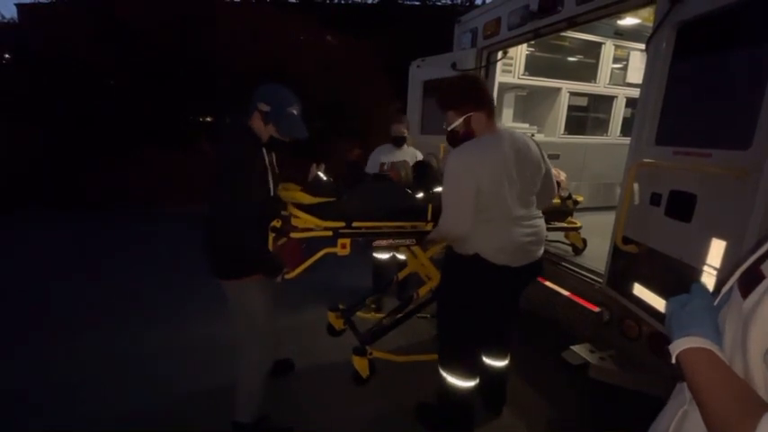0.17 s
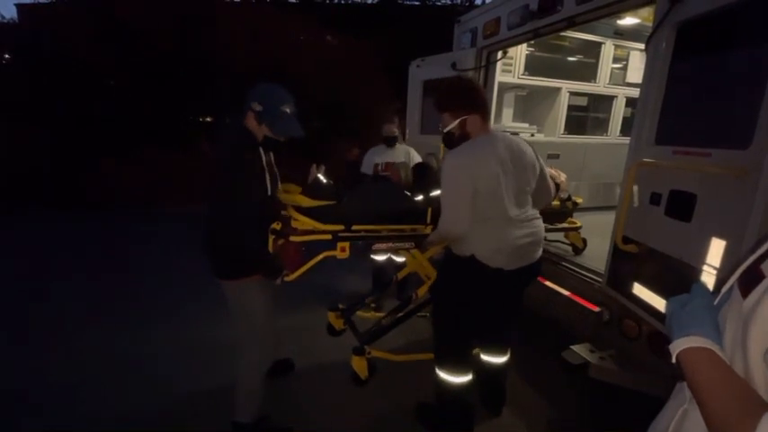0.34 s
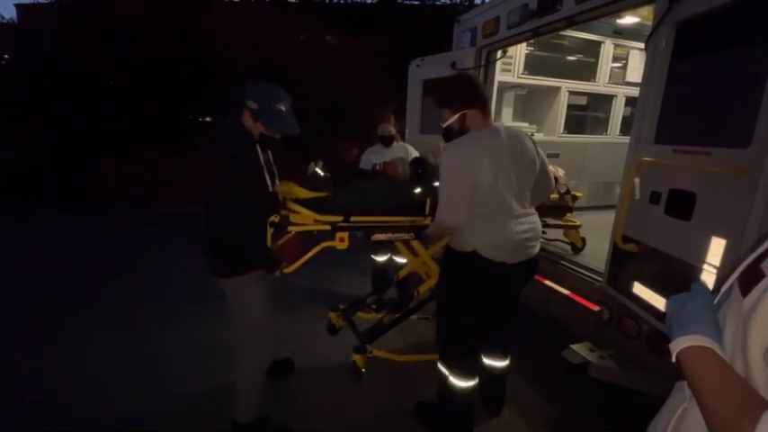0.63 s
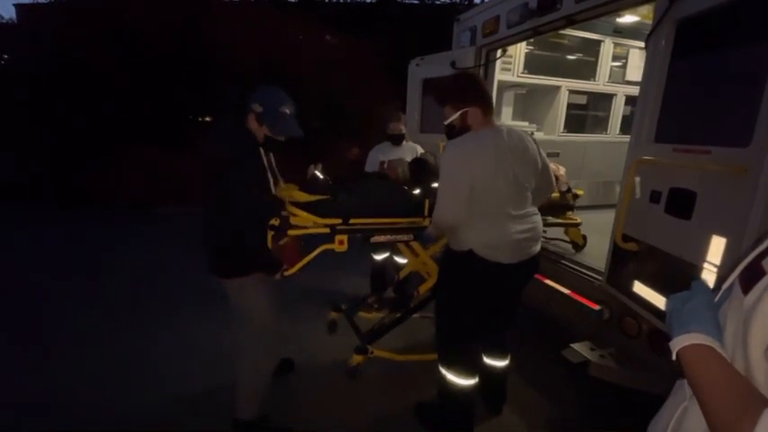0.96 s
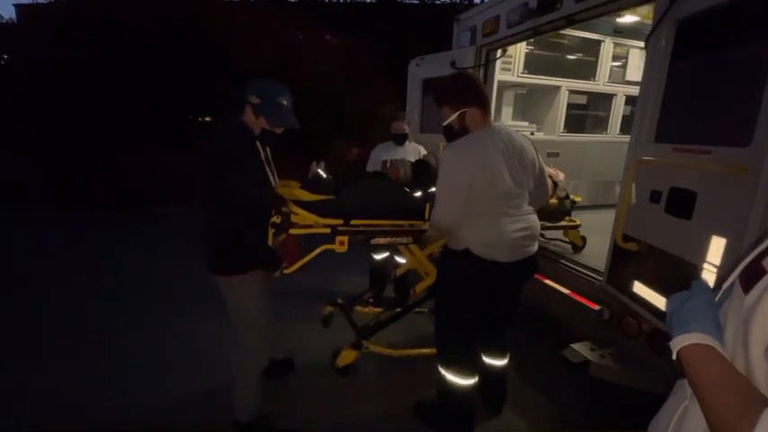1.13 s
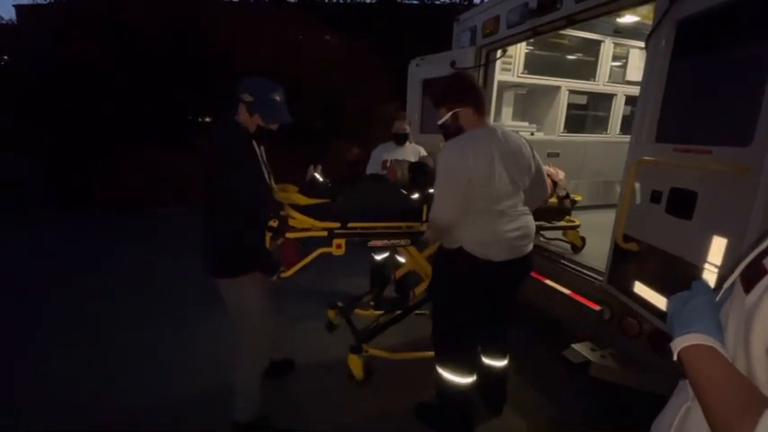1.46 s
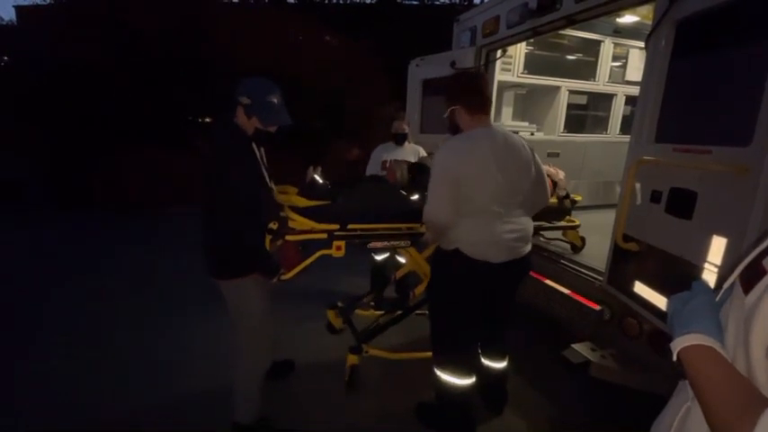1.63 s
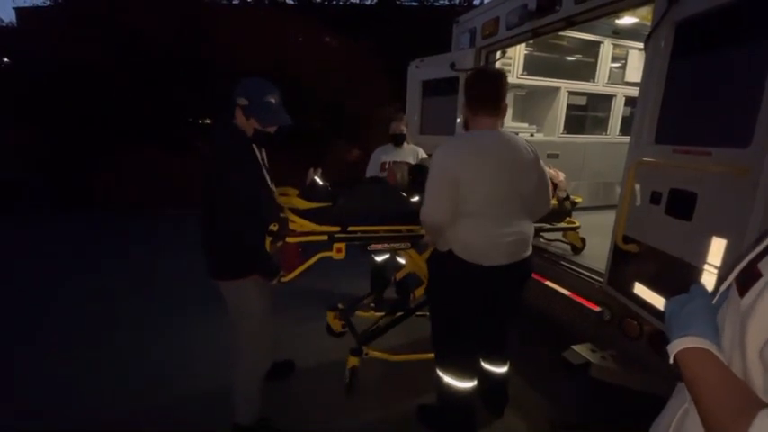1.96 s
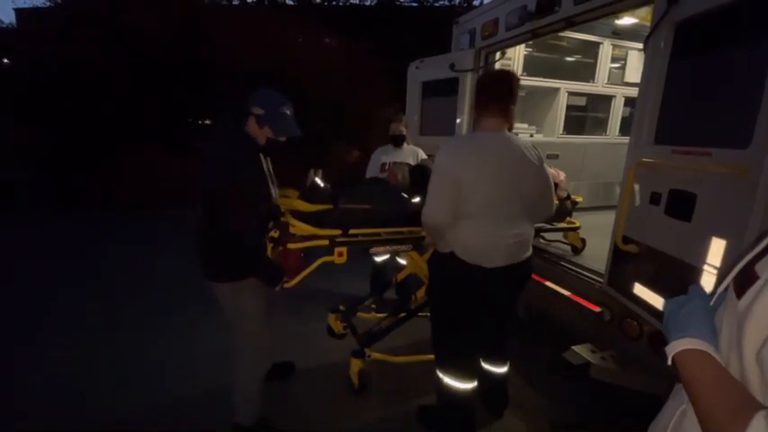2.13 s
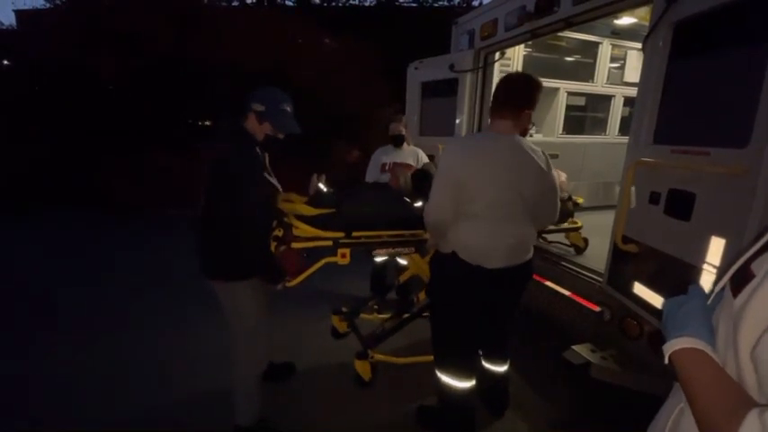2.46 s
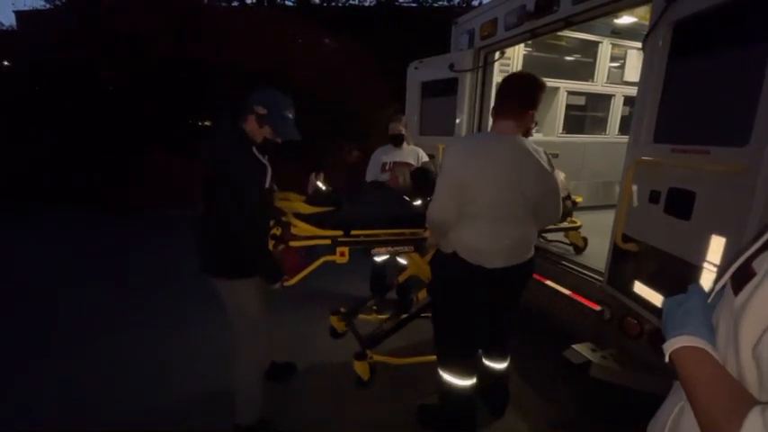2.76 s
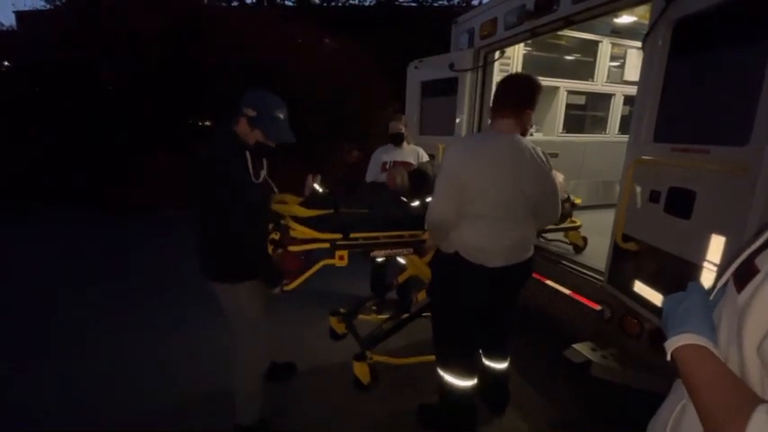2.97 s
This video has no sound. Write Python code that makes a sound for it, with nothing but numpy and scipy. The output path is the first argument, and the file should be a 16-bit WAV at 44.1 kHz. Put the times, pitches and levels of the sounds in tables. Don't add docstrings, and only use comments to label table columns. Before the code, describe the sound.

A wheeled metal stretcher clatters as it is lifted, quiets for a moment, then knocks and rattles densely as its legs fold; outdoors at night, close stereo pickup over a faint engine drone.

```python
import sys
import numpy as np
from scipy import signal
from scipy.fft import rfft, irfft
from scipy.io import wavfile
from scipy.ndimage import uniform_filter1d

SR = 44100
rng = np.random.default_rng(int(sys.argv[2]) if len(sys.argv) > 2 else 0)


def invert_db(level):
    return 10 ** (np.asarray(level, dtype=float) / 20)


def wav_out(sig):
    wavfile.write(sys.argv[1], SR, np.round(np.clip(np.atleast_2d(sig).T, -1, 1) * 32767).astype(np.int16))


N = 136710
HZ = np.maximum(np.fft.rfftfreq(N, 1 / SR), 1)

# frequency in Hz, level in dB per Hz.
NIGHT_SPECTRUM = [(15, -60), (25, -31), (86, -12.5), (271, -27), (2400, -54), (3400, -74), (5000, -56),
                  (8780, -56.5), (10600, -69)]
# frequency in Hz, correlation from -1 to 1.
NIGHT_CORRELATION = [(25, .6), (80, .8), (380, .5), (2400, .05)]
# start in seconds, level in dB, latch over tube in dB, pitch of the struck piece in Hz.
LIFT_KNOCKS = [(0.002, -29, -6.5, 2630), (0.068, -34.5, -1, 2100), (0.206, -34.5, -40, 1140),
               (0.266, -37.5, -14, 1170), (0.328, -32, -30, 1070), (0.35, -31.5, -10.5, 9300),
               (0.445, -39, -15, 1350), (0.466, -27.5, -7, 5230), (0.491, -34, -12, 2920),
               (0.51, -24.5, -35, 3000), (0.537, -22, -40, 1190), (0.577, -32, -2.5, 1150),
               (0.661, -21.5, -20, 4300), (0.675, -12, -25, 3300), (0.695, -13.5, -14.5, 840),
               (0.784, -23.5, -7.5, 1300), (0.815, -21, -10, 4380), (0.843, -15.5, -12, 1210),
               (0.919, -4.5, -13, 1050), (0.923, -8, -31, 1810), (0.961, -19.5, -9.5, 1650),
               (1.01, -15.5, -40, 3050), (1.052, -12.5, -43, 3150), (1.079, -17.5, -4, 4694),
               (1.096, -13, -6.5, 4740), (1.142, -21, -17, 9900), (1.253, -10.5, -29, 1360),
               (1.274, -24.5, -3.5, 1310), (1.313, -29.5, -9, 865), (1.438, -49, 9, 8800),
               (1.527, -57, 7, 6840), (1.606, -48, 0.5, 6240)]
# start in seconds, level in dB, latch over tube in dB, pitch of the struck piece in Hz.
FOLD_KNOCKS = [(1.952, -39, -5, 2800), (1.98, -51, 6, 3630), (2.046, -26, -7, 8860),
               (2.084, -20, -28, 1300), (2.098, -14.5, -9, 2620), (2.125, -10.5, -13, 1170),
               (2.138, -16.5, -5, 1090), (2.222, -16.5, -13.5, 1110), (2.25, -17.5, -30, 1100),
               (2.289, -19, -7.5, 1270), (2.324, -19, -4.5, 824), (2.347, -16.5, -13, 1320),
               (2.365, -11, -14, 880), (2.379, -7, -4, 950), (2.392, -14.5, -7.5, 940),
               (2.434, -24.5, -4.5, 1200), (2.497, -13.5, -12.5, 5300), (2.559, -18, -6, 1090),
               (2.583, -10.5, -9.5, 2340), (2.62, -3, -9.5, 5036), (2.642, -17, 4.5, 7400),
               (2.706, -16, -6, 4070), (2.731, -10.5, -24, 1150), (2.744, -25.5, -0.5, 1720),
               (2.794, -29, 0, 895), (2.808, -8, -14, 1300), (2.838, -6, -10, 1080),
               (2.85, -13, -0.5, 7850), (2.944, -21, -9.5, 2370), (3.002, -15, -16.7, 1270)]
KNOCKS = LIFT_KNOCKS + FOLD_KNOCKS
# time in seconds, rattle level in dB.
SHAKING = [(0, -44), (.33, -61.5), (.41, -67), (0.521, -40.5), (.63, -48), (1.0, -38.5), (1.22, -47),
           (1.45, -56.5), (1.7, -63.5), (1.92, -62), (2.12, -45.5), (2.6, -36.5), (3.003, -38),
           (3.092, -49.5)]
# frequency in Hz, width in Hz, level in dB.
TUBE_MODES = [(640, 49, -4), (820, 115, -1), (1116, 270, -0.5), (1270, 120, -2), (1733, 200, 4),
              (2230, 80, -6.5), (2460, 43, -4), (3150, 1100, -9.5)]
# frequency in Hz, width in Hz, level in dB.
LATCH_MODES = [(4680, 73, -12.5), (5850, 230, 3), (6270, 260, 4), (6840, 45, -4), (8750, 270, -28),
               (8700, 85, -11), (9220, 89, -11), (10840, 53, -7)]
# frequency in Hz, level in dB per Hz.
CONTACT_SPECTRUM = [(180, -21), (300, 2.5), (532, -12), (943, -5.5), (1540, -9.5), (2400, -19), (2970, -14),
                    (11000, -21.5), (15000, -28.5)]
# start in seconds, level in dB, pitch in Hz.
SHARP_TICKS = [(0.07, -38, 5230), (0.071, -37, 10980), (0.353, -41, 11400), (0.353, -44, 8700),
               (0.469, -35, 10940), (0.923, -23, 10160), (0.925, -31, 7850), (0.926, -18, 5500),
               (0.925, -13, 1810), (0.925, -19, 6760), (0.992, -29, 10850), (1.056, -21.5, 3180),
               (1.081, -36, 10900), (1.084, -28, 4700), (1.096, -45, 12400), (1.101, -34, 4530),
               (1.101, -41, 11110), (1.255, -19, 1930), (1.256, -29, 5600), (1.313, -35, 7200),
               (1.439, -49, 10100), (2.054, -40, 9000), (2.097, -23, 1210), (2.1, -23, 5860),
               (2.101, -40, 12300), (2.099, -44, 2600), (2.102, -31, 7940), (2.103, -26, 7300),
               (2.102, -30, 9150), (2.142, -23, 7130), (2.145, -23, 11000), (2.144, -20.5, 8780),
               (2.145, -18.5, 4780), (2.254, -22.5, 930), (2.349, -12, 1280), (2.382, -26, 1090),
               (2.386, -24, 9700), (2.387, -18, 4850), (2.387, -9, 6330), (2.395, -19, 9700),
               (2.398, -17, 8700), (2.398, -32, 12000), (2.398, -24, 11110), (2.398, -27, 5040),
               (2.506, -34, 5230), (2.565, -15.5, 1530), (2.629, -18, 11000), (2.64, -8, 6160),
               (2.64, -18, 9600), (2.644, -24, 10800), (2.71, -18, 4000), (2.732, -17, 1080),
               (2.746, -20.5, 5100), (2.797, -32, 10850), (2.813, -14.5, 900), (2.818, -16, 6070),
               (2.847, -20, 10800), (2.852, -24, 10800), (2.856, -27, 8530), (2.857, -26, 7700),
               (.205, -34, 1070), (.268, -35, 860), (.33, -31.5, 880), (.51, -25, 3160),
                 (.789, -23, 1190), (1.008, -24.5, 3160), (2.001, -36, 1070), (2.046, -29, 1050),
                 (2.221, -26, 1170), (2.33, -32, 4750), (2.582, -31, 4440), (2.793, -27, 1030)]
# start in seconds, level in dB, pitch in Hz.
DECK_THUMPS = [(.205, -36, 349), (0.543, -30, 285), (0.679, -15.5, 211.6), (0.7, -20.5, 297),
               (0.711, -21, 151), (0.726, -28, 76), (0.752, -27, 196.5), (0.839, -37.5, 380.5),
               (0.914, -37, 322), (0.917, -30, 102), (1.059, -21, 205), (1.071, -22, 119.4),
               (1.097, -30.5, 79), (1.116, -28.5, 185.5), (1.256, -37, 285), (2.102, -27, 300),
               (2.132, -26, 241.3), (2.228, -31.5, 324), (2.378, -20, 253), (2.388, -25.5, 106),
               (2.419, -30, 62.3), (2.618, -17, 323), (2.632, -27, 60.4), (2.669, -26.5, 144),
               (2.692, -30, 62), (2.81, -34, 66), (2.842, -27.5, 250), (2.844, -27, 154), (2.864, -31, 75)]
# frequency in Hz, lead in radians.
LEFT_LEAD = [(0, 0), (1290, 2.6), (4820, 12.9), (7600, 19.5), (13000, 20.5)]
# frequency in Hz, left over right in dB.
LEFT_OVER_RIGHT = [(60, -3), (380, -2), (700, 5.5), (1290, 8.5), (2380, -2), (4400, 8), (8120, -0.5),
                   (15000, -2.5)]

CONTACTS_PER_S, KNOCK_DB = 5000, -14


def rms_one(x):
    return x / np.sqrt(np.mean(x ** 2) + 1e-20)


def at_hz(points):
    hz, value = np.transpose(points)
    return np.interp(np.log(HZ), np.log(hz), value)


def coloured(x, points):
    return irfft(rfft(x) * rms_one(invert_db(at_hz(points))), N)


def drift(rate_hz):
    r = np.exp(-2 * np.pi * rate_hz / SR)
    noise = rng.standard_normal(N + SR)
    return rms_one(signal.lfilter([1], [1, -2 * r, r * r], noise)[SR:])


def grains(rate_per_s):
    weakening = np.minimum(rng.exponential(1, N), 4)
    sizes = invert_db(-1 * weakening) * rng.choice([-1, 1], N)
    return rms_one(sizes * (rng.random(N) < rate_per_s / SR))


def resonance(x, hz, width_hz):
    r = np.exp(-np.pi * width_hz / SR)
    poles = [1, -2 * r * np.cos(2 * np.pi * hz / SR), r * r]
    return signal.lfilter([1, 0, -1], poles, x + 1e-18) * np.sqrt((1 - r * r) / 2)


def night():
    night_db, engine_hz, engine_width_hz, engine_db = -40, 78.5, 26, -52.5
    mid, side = rfft(rng.standard_normal((2, N)))
    alike = np.clip(at_hz(NIGHT_CORRELATION), -1, 1)
    air = irfft(np.sqrt(1 + alike) * mid + np.sqrt(1 - alike) * side * [[1], [-1]], N)
    drone = resonance(rng.standard_normal(N), engine_hz, engine_width_hz)
    drone = resonance(drone, engine_hz, engine_width_hz)
    return invert_db(night_db) * rms_one(coloured(air, NIGHT_SPECTRUM)) + invert_db(engine_db) * rms_one(drone)


def bursts():
    rise_s, hold_s, fall_t60_s = 0.0025, 0.0048, 0.07
    tail_db, tail_t60_s = -14.5, .25
    t = np.arange(SR // 4) / SR
    after = np.maximum(t - rise_s - hold_s, 0)
    fall = invert_db(-60 * after / fall_t60_s)
    tail = invert_db(tail_db - 60 * t / tail_t60_s)
    starts = (np.transpose(KNOCKS)[0][:, None] * SR).astype(int)
    return np.minimum(t / rise_s, 1) * (fall + tail), starts + np.arange(len(t))


def part(modes, knock_db, rattle_db, band):
    ring_db, mode_spread_db = -13, 4.5
    scatter_db, scatter_t60_s = -2, .07
    rattles_per_s, rattle_lumps_db = 3100, 0.5
    shape, at = bursts()
    lumps = rms_one(invert_db(2.5 * drift(167)))

    def power(db):
        knocks = (invert_db(db)[:, None] * shape) ** 2
        return np.bincount(at.ravel(), knocks.ravel(), N + SR)[:N]

    def force(db):
        knocking = np.sqrt(power(db)) * lumps * grains(CONTACTS_PER_S)
        rattling = invert_db(rattle_db + rattle_lumps_db * drift(38)) * grains(rattles_per_s)
        return knocking + rattling

    chance_db = mode_spread_db * rng.standard_normal((len(at), 16))
    rings = np.zeros(N)
    for k, (hz, width_hz, db) in enumerate(modes):
        rings += invert_db(db) * resonance(force(knock_db + chance_db[:, k]), hz, width_hz)

    r = invert_db(-120 / scatter_t60_s / SR)
    diffuse_power = signal.lfilter([1 - r], [1, -r], power(knock_db) + invert_db(2 * rattle_db))
    scattered = invert_db(scatter_db) * np.sqrt(diffuse_power) * rng.standard_normal((2, N))
    scattered = signal.lfilter([.5, .5], [1], scattered)

    bare = coloured(np.vstack([force(knock_db), scattered]), CONTACT_SPECTRUM)
    bare = signal.sosfilt(signal.butter(2, 3300, band, fs=SR, output="sos"), bare)
    bare = signal.sosfilt(signal.butter(2, 328, "high", fs=SR, output="sos"), bare)
    return bare + invert_db(ring_db) * rings * [[1], [0], [0]]


def struck_parts():
    shape, at = bursts()
    out = np.zeros(N + SR)
    contacts = np.append(grains(CONTACTS_PER_S), np.zeros(SR))
    for (_, db, _, hz), span in zip(KNOCKS, at):
        ring_db, width_hz = (-9, 90) if hz > 2800 else (-4, 110)
        out[span] += invert_db(db + KNOCK_DB + ring_db) * resonance(shape * contacts[span], hz, width_hz)
    return out[:N]


def ticks():
    rise_s, t60_s, t60_cycles = 0.0012, 0.023, 7.6
    partner_level, partner_spread = 0.44, 0.057
    snap_db, snap_t60_s = -3, .006
    out, t = np.zeros(N + SR), np.arange(SR // 10) / SR
    snap = 1 + invert_db(snap_db - 60 * t / snap_t60_s) * rng.standard_normal(len(t))
    events = SHARP_TICKS
    for (s, db, hz), (phase, side) in zip(events, rng.uniform(-1, 1, (len(events), 2))):
        shape = np.minimum(t / rise_s, 1) * invert_db(db - 60 * t / (t60_s + t60_cycles / hz))
        partner_hz = hz * (1 + partner_spread * side)
        pair = np.sin(2 * np.pi * hz * t) + partner_level * np.sin(2 * np.pi * partner_hz * t + phase)
        start = int(s * SR)
        out[start:start + len(t)] += shape * pair * snap
    return out[:N]


def deck(shake_db):
    swell_s, swell_cycles, sag = 0.0083, 0.66, 0.046
    body_db, hum_db = -14.5, -3.5
    out, t = np.zeros(N + SR), np.arange(SR // 4) / SR
    for (s, db, hz), phase in zip(DECK_THUMPS, rng.uniform(0, 2 * np.pi, len(DECK_THUMPS))):
        u = t / (swell_s + swell_cycles / hz)
        sagging = 1 - sag * (u / 2 - 1) / (1 + u / 4)
        wave = np.sin(2 * np.pi * hz * t * sagging + phase)
        start = int(s * SR)
        out[start:start + len(t)] += invert_db(db) * u * np.exp(1 - u) * wave
    thumps = out[:N]
    jolt = invert_db(body_db) * uniform_filter1d(abs(thumps), size=400)
    hum = invert_db(shake_db + hum_db + 1.23 * drift(34))
    push = (jolt + hum) * rng.standard_normal(N)
    return thumps + resonance(push, 149, 33) + resonance(push, 207.0, 42) + resonance(push, 273, 94)


def to_pair(x):
    echo_db, echo_t60_s = -10, .12
    t = np.arange(SR // 8) / SR
    echoes = rng.standard_normal((2, len(t))) * invert_db(-60 * t / echo_t60_s) * (t > .002)
    echoes = rms_one(echoes) / np.sqrt(len(t))
    echoes = signal.sosfilt(signal.butter(2, [350, 9500], "band", fs=SR, output="sos"), echoes)
    lead = np.interp(HZ, *np.transpose(LEFT_LEAD))
    half = invert_db(at_hz(LEFT_OVER_RIGHT) / 2) * np.exp(.5j * lead)
    direct = np.array([half, 1 / half])
    return irfft(rfft(x) * (direct + invert_db(echo_db) * rfft(echoes, N)), N)


def scene():
    background = night()
    shake_db = np.interp(np.arange(N) / SR, *np.transpose(SHAKING))
    _, db, latch_db, _ = np.transpose(KNOCKS)
    tubes = part(TUBE_MODES, db + KNOCK_DB, shake_db + 1.5, "low")
    latch_rattle_db = shake_db - 4.5 + 0.29 * (shake_db + 43.5)
    latches = part(LATCH_MODES, db + KNOCK_DB + latch_db + 8, latch_rattle_db, "high")
    frame = tubes + latches
    direct = frame[0] + struck_parts() + ticks() + deck(shake_db)
    return to_pair(direct) + frame[1:] + background


def top_cut(x):
    return signal.sosfilt(signal.butter(12, 16480, fs=SR, output="sos"), x)


def record(dry):
    shelf_hz, shelf_db, top_hz = 13430, -24, 15900
    top = np.where(HZ < shelf_hz, 1, invert_db(shelf_db)) * (HZ < top_hz)
    mix = irfft(rfft(np.tanh(dry)) * top, N)
    return top_cut(mix)


dry = scene()
out = record(dry)
wav_out(out)
```